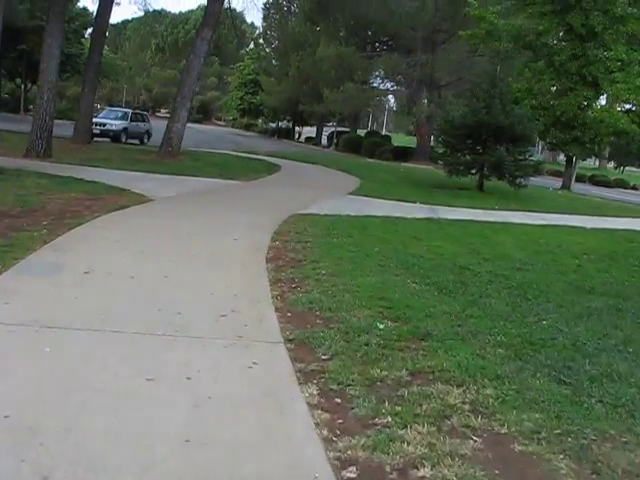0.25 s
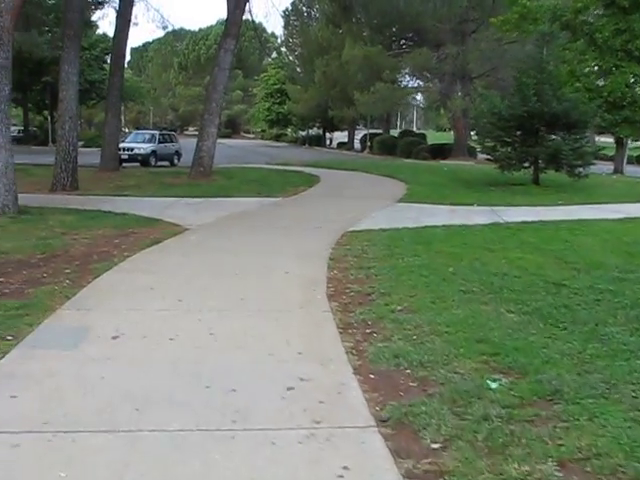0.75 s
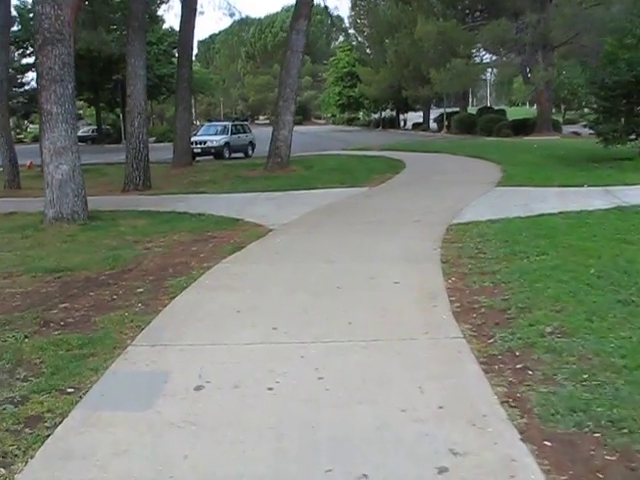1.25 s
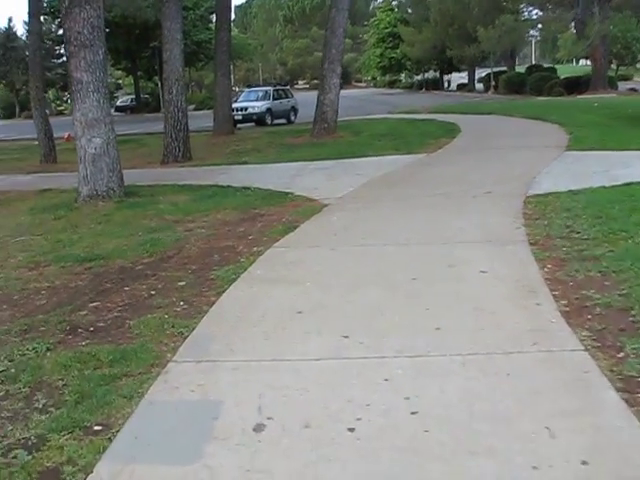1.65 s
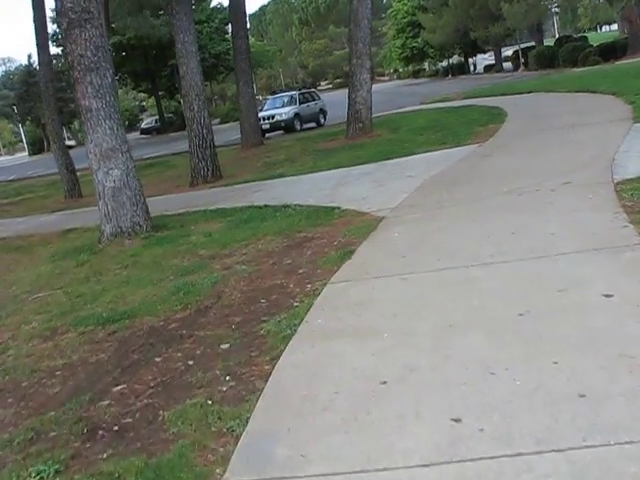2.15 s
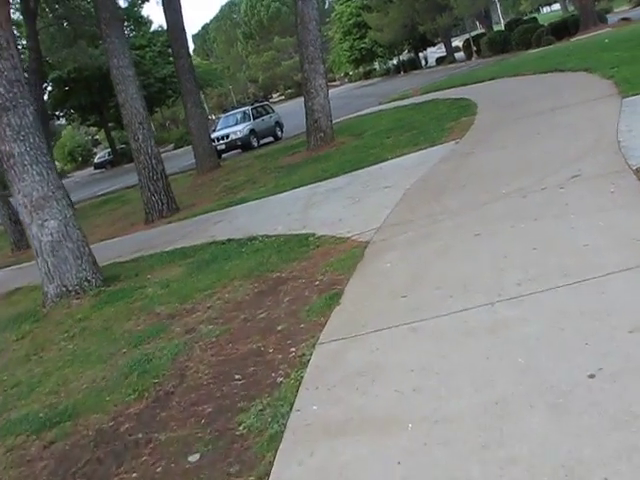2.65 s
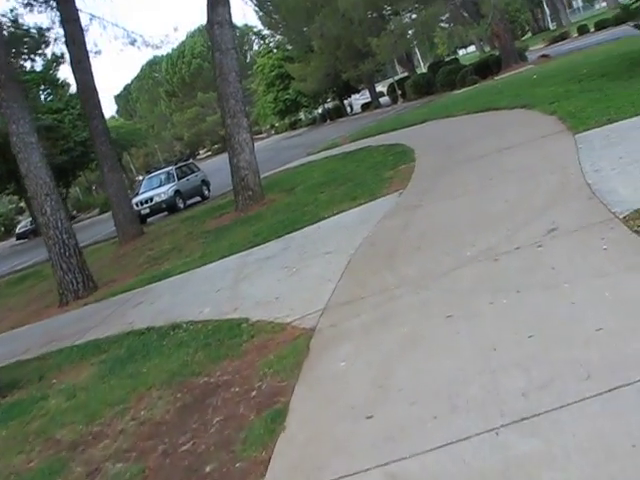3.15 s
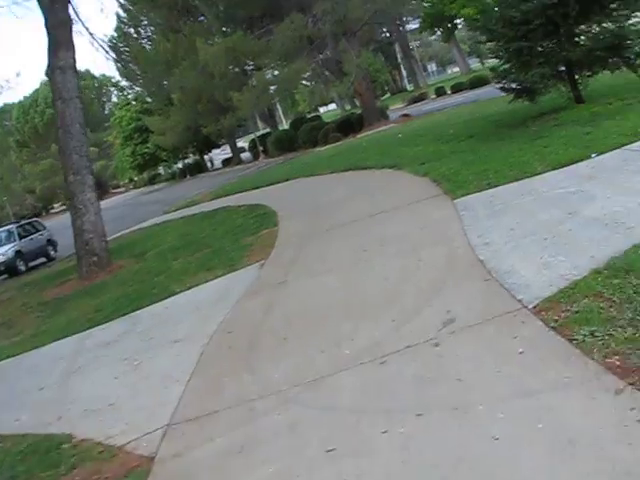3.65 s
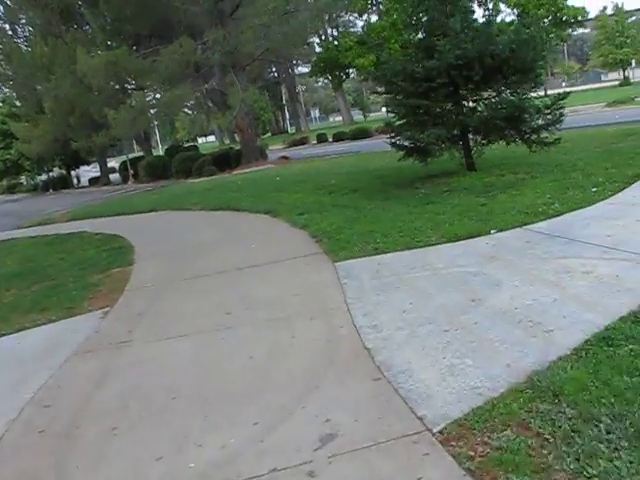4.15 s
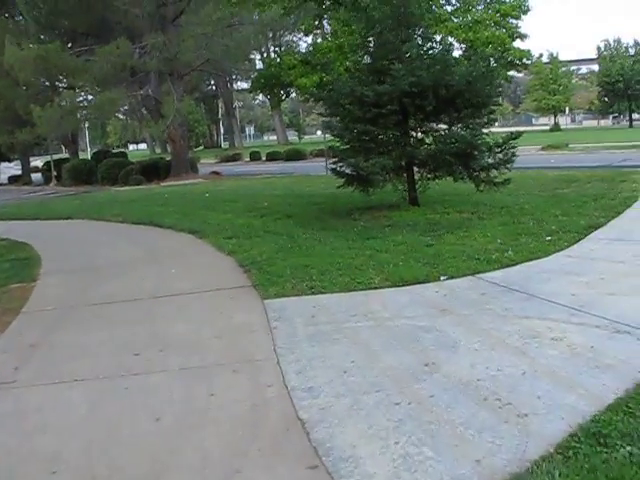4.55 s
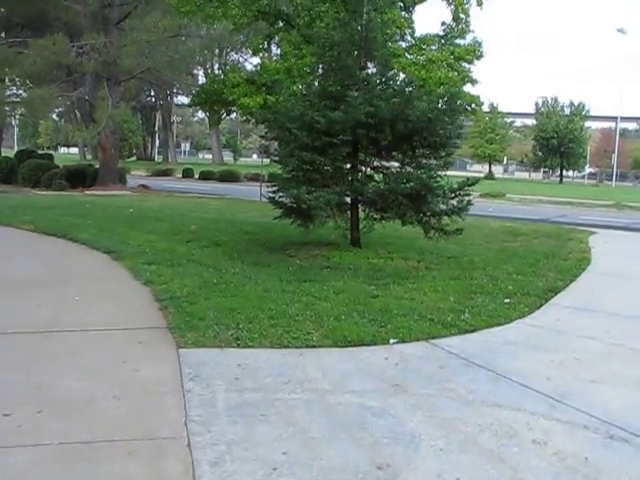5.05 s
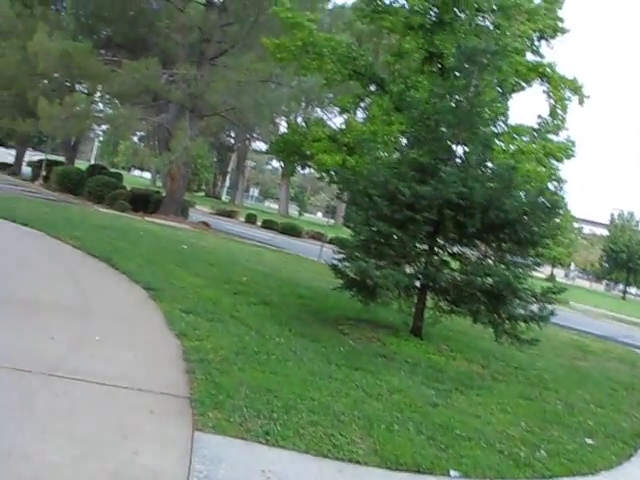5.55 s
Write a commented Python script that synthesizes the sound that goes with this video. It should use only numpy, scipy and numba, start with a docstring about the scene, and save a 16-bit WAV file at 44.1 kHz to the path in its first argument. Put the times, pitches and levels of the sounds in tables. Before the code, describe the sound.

A skateboard rolls on a concrete path in a leafy park, heard close from a stereo microphone above the board. Low, lumpy wind buffets the channels independently, far heavier on the right, with strong pops around 0.6-0.8, 2.1 and 3.1 seconds. A faint high bird repeats a falling note five times between 0.35 and 0.95; other thin chirps follow, clearest near 2.3, 4.3 and 4.9. Front and rear wheels clack over joints at about 0.25 and 0.5, 1.2 and 1.45, 2.2 and 2.5, 3.2 and 3.5, 4.4 and 4.7, then front wheels alone at 5.65. Each gives clustered hollow deck knocks, a short metallic rattle and a dull weight thud. Between them, grainy rolling, deck hum, hiss and bearing chatter continue, with tiny squeaks and grit ticks. After 3.5 the right wind mostly weakens; from 4.2 the wheel roar swells to the end while its ringing tone slides lower.

```python
"""Skateboard on a concrete path, heard at a two-port microphone above it; 5.8 s.
From the start, wind eddies and pops hit the ports, the right one more; a bird repeats a falling note.
At each slab joint front, then rear wheels drop, ringing the deck modes; trucks crack, the rider's weight thuds.
Concrete grain keeps deck and wheels humming; bearings chatter and squeak; other birds call throughout.
After about 3.5 s the right-port wind is mostly weaker; the wheel roar swells to the end as its ring falls."""
import sys
import numpy as np
from scipy import signal
from scipy.io import wavfile
from scipy.ndimage import uniform_filter1d
from numba import njit

SR = 44100
rng = np.random.default_rng(int(sys.argv[2]) if len(sys.argv) > 2 else 0)


def log_audio(samples):
    """Write samples as a 16-bit WAV file to the path given in sys.argv[1]."""
    # one column per channel
    frames = np.atleast_2d(samples).T
    # limit to full scale, then quantise
    limited = np.clip(frames, -1, 1)
    pcm = np.round(limited * 32767).astype(np.int16)
    wavfile.write(sys.argv[1], SR, pcm)


N = 254898

# one bird's repeated falling note: start_s, length_s, start_hz, level_db
SONG_NOTES = [(0.347, 0.054, 6560, -69), (.475, 0.071, 6660, -67), (.615, 0.084, 6600, -65),
              (.745, .062, 6770, -65), (.885, 0.07, 6270, -65)]
SONG_FALL_S, SONG_FALL_HZ = .066, 760   # a note this long falls this far; the fall grows as length squared
# other birds: start_s, length_s, start_hz, target_hz, level_db, left_minus_right_db
BIRD_CALLS = [(0.788, 0.058, 3740, 3640, -71, 0), (.985, .04, 3480, 3400, -70, 0),
              (1.085, .07, 3420, 3300, -72, 0), (1.985, 0.032, 3800, 3850, -64, -4),
              (2.264, 0.026, 4660, 4370, -59, -4), (2.602, .04, 3900, 3850, -67, -9),
              (3.8, .016, 3350, 3600, -61, 0), (3.818, 0.015, 3900, 3980, -61.5, 2),
              (4.006, 0.13, 4550, 4280, -73, 24), (4.26, 0.05, 3600, 3580, -60, -4),
              (4.88, .034, 3600, 4000, -62, 4), (4.944, .062, 3300, 3640, -57, 0)]
# wind on the ports: time_s, left_db, right_db, right_centre_hz
PORT_WIND = [(0, -30, -13, 148), (.35, -32, -22, 79), (.6, -28, -16, 142), (.8, -29.5, -16.5, 145),
             (.97, -27, -19, 86), (1.5, -29.5, -14.5, 78.3), (2, -32.5, -18.5, 77),
             (2.45, -25, -15.5, 87.4), (2.75, -23, -16, 95), (2.9, -18, -12.5, 108),
             (3.05, -26.5, -15.5, 94), (3.2, -22.5, -14.5, 91), (3.55, -30.5, -27, 87),
             (4.1, -28.5, -22, 83.5), (4.5, -30, -21.5, 85), (5.2, -31.5, -27, 86), (5.62, -27, -18.5, 78),
             (5.78, -21, -26, 77)]
# left port's wind centre, rising over the first second, then falling to the end: time_s, centre_hz
LEFT_WIND_CENTRE = [(0, 157), (1, 203), (3.3, 150), (4.6, 95), (5.78, 85)]
# loudest gust pops on the right port: start_s, peak_db (before the last softening)
GUST_POPS = [(.009, -6), (0.083, -12), (0.542, -27), (.631, -4.5), (0.7, -19), (.741, -7), (0.785, -3.5),
             (0.887, -18), (0.99, -26), (1.366, -25), (1.534, -14), (1.718, -14), (2.111, -6.5),
             (2.612, -16), (2.917, -26.5), (3.093, -12), (3.12, -7.5)]
# rolling: time_s, roar_db, low_rattle_db, high_rattle_db
ROLLING = [(0, -54.5, -63.5, -69), (.24, -50, -67.5, -80), (.45, -50.5, -60.5, -81),
           (.66, -51.5, -62.5, -79), (.9, -57.5, -70.5, -90), (1.2, -52, -71.5, -77),
           (1.4, -51.5, -63, -71.5), (1.8, -54.5, -70.5, -74), (2.08, -53, -68.5, -76),
           (2.32, -51.5, -63.5, -72.5), (2.8, -51, -68, -73), (3.4, -50.5, -67, -79), (3.9, -51, -72, -78),
           (4.25, -48.5, -64.5, -72), (4.62, -46, -64, -74), (5.15, -43, -70, -75), (5.4, -41.5, -59, -70),
           (5.78, -38.5, -64, -75)]
# wheel roar spectrum: freq_hz, relative_db_per_hz
ROAR_SPECTRUM = [(350, -30), (600, -4), (796, -34), (933, 1), (1270, -8), (1610, -3), (1800, -5.5),
                 (2030, -18.5), (2600, -24.5), (3380, -54), (5720, -120)]
# treble hiss spectrum: freq_hz, relative_db_per_hz
HISS_SPECTRUM = [(1500, -20), (2000, -11.5), (2800, -8.5), (4000, -13.5), (5600, -18.5), (6500, -19),
                 (9000, -20), (11500, -24.5), (14000, -32.5), (16000, -27)]
# left-right likeness of roar and hiss: freq_hz, likeness
STEREO_LIKENESS = [(60, 0.13), (130, 0.1), (290, 0.23), (640, 0.17), (1410, 0.79), (3100, 0.062),
                   (8000, 0.16), (15000, 0.22)]
REF_ROAR_DB, REF_RATTLE_DB = -50, -68
HISS_DB, HISS_PER_ROAR, HISS_PER_RATTLE = -61, .25, .4   # at reference; dB per dB of each
HUM_DB, HUM_PER_ROAR = -34.5, 0.55   # at reference roar; dB per dB
# faint pair of whistles: freq_hz, level_db
WHINE_PAIR = [(7852, -86.5), (7882, -86)]
# lower bearing bands: freq_hz, level_db (at loudest rattle), t60_s (each of two resonators), growth_db_per_db
# level_db is added to the rattle level
LOW_BEARING_MODES = [(4550, 1, 0.0021, 1.24), (7980, -6.5, 0.0032, 1.8)]
# upper bearing bands: same columns
HIGH_BEARING_MODES = [(10350, 2.5, 0.0023, 2), (12900, -3, .0025, 2.5)]
# bearing squeaks: start_s, length_s, start_hz, target_hz, level_db
BEARING_SQUEAKS = [(1.5, .02, 10900, 11000, -70), (1.82, .02, 12100, 12200, -72),
                   (2.1, .025, 12000, 12100, -75), (5.228, .055, 12600, 13400, -72),
                   (5.41, .02, 11000, 11300, -69), (5.565, 0.051, 12500, 13000, -72)]
# wheel resonance, lower as the board slows: time_s, centre_hz
WHEEL_RING_PITCH = [(0, 1810), (3.3, 1700), (4.7, 1584), (5.78, 1530)]
WHEEL_RING_DB, WHEEL_RING_DAMPING = -9, 0.087   # re roar; width over centre
# grit flung by a wheel: start_s, relative_db, freq_hz
GRIT_TICKS = [(2.733, -34, 9700), (3.0, -46, 10000), (5.157, -36, 13300), (5.638, -25, 6150),
              (5.673, -29, 5470)]
# the rider's weight lands: start_s, push_db
WEIGHT_THUDS = [(0.2585, -27), (.504, -11), (1.1792, -28), (1.4444, -17), (2.229, -13), (2.5022, -4),
                (3.233, -22), (3.514, -17.5), (4.401, -12), (4.4238, -7), (4.705, -21), (5.635, -11),
                (5.674, -4.5)]
# a wheel drops over a joint: start_s, axle, knock_db, crack_db, hardness_db_per_octave
JOINT_DROPS = [(0.2469, "front", -8.5, -18, 1.5), (0.2514, "front", -5, -27, 3),
               (0.2579, "front", -3.5, -32, 9), (.501, "rear", -12, -28, -0.5),
               (0.5074, "rear", -8.5, -27, -1), (1.1788, "front", -12.5, -26, 4.5),
               (1.194, "front", -7, -22, 3), (1.206, "front", -13, -32, 4),
               (1.4468, "rear", -19.5, -42, -7.5), (1.465, "rear", -15.5, -27, 1.5),
               (2.2206, "front", -13, -30.5, -5), (2.2366, "front", -8, -20.5, -1.5),
               (2.486, "rear", -17, -33, 0.5), (2.503, "rear", -8.5, -26, 1.5),
               (3.2321, "front", -5, -26.5, -6), (3.2385, "front", -5, -28.5, 5),
               (3.5095, "rear", -15, -35, 6), (3.5155, "rear", -9, -25, 4.5), (4.4, "front", -18, -24, 5.5),
               (4.422, "front", -13, -29, 7.5), (4.431, "front", -16, -36, 4),
               (4.708, "rear", -16, -35, -2.5), (4.732, "rear", -10.5, -34, 0.5),
               (4.739, "rear", -12.5, -40, 0), (5.633, "front", -22, -29, 9),
               (5.668, "front", -16, -33, 7.5), (5.678, "front", -19.5, -35, 8.5)]
# likeness of a blow to the rear of the deck: axle -> share (0-1)
AXLE_REAR_SHARE = {"front": 0.32, "rear": 0.86}
# deck and trucks: freq_hz, front_db, rear_db, rolling_db (all relative), t60_s (for knocks)
DECK_MODES = [(226.5, -22, 5, -15.5, 0.049), (306, -20.5, -18, -34.5, 0.083), (384.3, 6, -7.5, 8.5, 0.057),
              (455, -29.5, -21.5, -5, 0.12), (544.7, -18.5, -13, -5.5, 0.074), (669, -7.5, -9, -9.5, 0.024),
              (772, -15, -17, -21, 0.042), (937, -19.5, -19, -38.5, 0.034),
              (1130, -36.5, -22, -25.5, 0.034), (1370, -44, -56, -21, 0.043), (1673, -28.5, -28, -32, 0.05),
              (1780, -23.5, -33, -39.5, 0.04)]
CUTOFF_HZ = 15750


def amp(db):
    """dB to gain."""
    return 10 ** (np.asarray(db) / 20)


def rms_one(x):
    """Scale to rms 1."""
    return x / np.sqrt(np.mean(x ** 2) + 1e-20)


def in_time(rows):
    """Interpolate each column over all samples."""
    s, *columns = np.transpose(rows)
    return [np.interp(np.arange(N) / SR, s, c) for c in columns]


def at_hz(points, hz):
    """Read a table on a log-frequency axis."""
    table = np.array(points)
    return np.interp(np.log(hz), np.log(table[:, 0]), table[:, 1])


def drift(rate_hz):
    """Slow random curve, spread 1: two-pole low-passed noise."""
    step = 40   # samples per slow sample
    r = np.exp(-2 * np.pi * rate_hz * step / SR)
    white = rng.standard_normal(N // step + 2002)
    slow = signal.lfilter([1], [1, -2 * r, r * r], white)[2000:]   # drop the settling
    return np.interp(np.arange(N) / step, np.arange(len(slow)), rms_one(slow - slow.mean()))


def band_filter(x, order, low_hz, high_hz):
    """Butterworth band-pass."""
    return signal.sosfilt(signal.butter(order, [low_hz, high_hz], "band", fs=SR, output="sos"), x)


def ring(push, hz, t60_s):
    """Resonator: a unit click sets a decaying sine of height 1 ringing."""
    r, w = amp(-60 / (t60_s * SR)), 2 * np.pi * hz / SR
    return signal.lfilter([0, np.sin(w)], [1, -2 * r * np.cos(w), r * r], push + 1e-18)


def clicks(times_s, sizes):
    """Click train."""
    out = np.zeros(N)
    np.add.at(out, (np.asarray(times_s) * SR).astype(int), sizes)
    return out


def fade(x, t60_s):
    """Each click becomes an exponential decay."""
    return signal.lfilter([1], [1, -amp(-60 / (t60_s * SR))], x + 1e-18)


def soften(x, hz):
    """Two one-pole low-passes: a yielding contact spreads a click in time."""
    r = np.exp(-2 * np.pi * hz / SR)
    return signal.lfilter([(1 - r) ** 2], [1, -2 * r, r * r], x + 1e-18)


@njit
def sweep(x, hz, damping):
    """Band-pass with a moving centre; power of white noise kept even."""
    out, low, band = np.zeros(len(x)), 0., 0.
    for i in range(len(x)):
        f = 2 * np.pi * hz[i] / SR
        band += f * (x[i] - low - damping * band)
        low += f * band
        out[i] = band / np.sqrt(f)
    return out


def whistles(notes, waver_share, flicker_db):
    """Thin rough sines: a falling note bends late, a rising one arches over."""
    out, waver = np.zeros((2, N)), drift(90)
    for s, length_s, start_hz, target_hz, db, pan_db in notes:
        u = np.linspace(0, 1, int(length_s * SR))
        first = int(s * SR)
        span = slice(first, first + len(u))
        bend = u ** 3.8 if target_hz < start_hz else np.sin(2.5 * u)
        hz = (start_hz + (target_hz - start_hz) * bend) * (1 + waver_share * waver[span])
        envelope = np.sqrt(2) * amp(db) * np.sin(np.pi * u) ** .5
        note = envelope * np.sin(2 * np.pi * np.cumsum(hz) / SR)
        out[:, span] += note * amp([[pan_db / 2], [-pan_db / 2]])
    return out * amp(flicker_db * drift(60))


def birds():
    """Wavering sines: the repeated falling note and the scattered calls."""
    song = []
    for s, length_s, hz, db in SONG_NOTES:
        fall_hz = SONG_FALL_HZ * (length_s / SONG_FALL_S) ** 2
        song.append((s, length_s, hz, hz - fall_hz, db, 0))
    return whistles(song + BIRD_CALLS, waver_share=.005, flicker_db=3.0)


def port_wind(level_db, centre_hz, damping, lumpy_db, skirt, buffet_db, roof_hz):
    """Eddies tumble past one port: lumpy noise about a moving centre, slow buffeting below."""
    white = rng.standard_normal((2, N)) * amp(lumpy_db * drift(18.0))
    eddies = sweep(sweep(white[0], centre_hz, damping), centre_hz, skirt)
    eddies = soften(eddies, roof_hz)
    eddies = eddies / np.sqrt(uniform_filter1d(eddies ** 2, SR // 2))   # level evened over 0.5 s
    buffet = band_filter(white[1], 2, 22, 70)
    return amp(level_db) * (eddies + amp(buffet_db) * rms_one(buffet))


def gust_pops(level_db, centre_hz):
    """Gusts pop on the right port: sparse dull ticks, louder as the wind brightens, plus listed deep pops."""
    ticks = rng.random(N) < 260 / SR   # mean 260 per second
    sizes = amp(4.9 * np.minimum(rng.exponential(1, N), 4))
    ticks = ticks * sizes * rng.choice([-1, 1], N)
    tick_db = level_db - 37.5 + 37.0 * np.log2(centre_hz / 110)
    small = amp(tick_db) * rms_one(band_filter(ticks, 3, 220, 1450))

    s, peak_db = np.transpose(GUST_POPS)
    unit_peak = band_filter(clicks([0], 1)[:SR // 10], 2, 110, 650).max()
    deep = band_filter(clicks(s, amp(peak_db)) + 1e-18, 2, 110, 650)
    return small + soften(deep, 650) / unit_peak


def wind():
    """Independent turbulence at each port; pops on the right."""
    left_db, right_db, right_hz = in_time(PORT_WIND)
    left_hz, = in_time(LEFT_WIND_CENTRE)
    left = port_wind(left_db, left_hz, damping=0.43, lumpy_db=0.5, skirt=1.27, buffet_db=-8, roof_hz=700)
    right = port_wind(right_db, right_hz, damping=1.32, lumpy_db=2.5, skirt=1.62, buffet_db=-8, roof_hz=844)
    return np.array([left, right + gust_pops(right_db, right_hz)])


def whine():
    """Noise through two narrow resonators: a faint pair of whistles."""
    return sum(amp(db) * rms_one(ring(rng.standard_normal(N), hz, 0.35)) for hz, db in WHINE_PAIR)


def noise_bands(spectrum, low_hz, high_hz, patchy_db, count):
    """Stereo noise in count - 1 bands, each with its own level, flicker and likeness; rms 1."""
    out, edges = 0, np.geomspace(low_hz, high_hz, count)
    white, together = rng.standard_normal((2, 2, N)), drift(2.7)
    for k, (low, high) in enumerate(zip(edges, edges[1:])):
        mid, side = band_filter(white[k % 2], 2, low, high)
        hz = np.sqrt(low * high)
        alike = np.clip(at_hz(STEREO_LIKENESS, hz), -1, 1)
        gain = amp(at_hz(spectrum, hz) + patchy_db * (.6 * together + drift(5)))
        out = out + gain * (np.sqrt(1 + alike) * mid + np.sqrt(1 - alike) * side * [[1], [-1]])
    return rms_one(out)


def wheel_noise(roar_db, low_rattle_db):
    """Rough rolling contact: band noise for roar, and hiss that follows roar and rattle."""
    hiss_db = HISS_DB + HISS_PER_ROAR * (roar_db - REF_ROAR_DB)
    hiss_db = hiss_db + HISS_PER_RATTLE * (low_rattle_db - REF_RATTLE_DB)
    roar = amp(roar_db) * noise_bands(ROAR_SPECTRUM, 574, 2560, patchy_db=1.64, count=12)
    hiss = amp(hiss_db) * noise_bands(HISS_SPECTRUM, 2000, 16500, patchy_db=1.15, count=13)
    return roar + hiss


def wheel_ring(roar_db):
    """Concrete grain keeps one wheel resonance sounding, partly unlike in the two ports."""
    hz, = in_time(WHEEL_RING_PITCH)
    mid, side = (rms_one(soften(sweep(grain, hz, WHEEL_RING_DAMPING), 2400))
                 for grain in rng.standard_normal((2, N)))
    return amp(roar_db + WHEEL_RING_DB + 2.0 * drift(6.3)) * (mid + .45 * side * [[1], [-1]])


def bearings(level_db, modes):
    """Loose balls chatter: flickering noise rings each mode; growth sets how fast it rises with rattle."""
    out, loudest_db = 0, level_db.max()
    for hz, db, t60_s, growth in modes:
        mid, side = rng.standard_normal((2, N)) * amp(1.5 * drift(30))
        chatter = mid + 0.84 * side * [[1], [-1]]
        gain = amp(db + loudest_db + growth * (level_db - loudest_db) + 1.2 * drift(1.2))
        out = out + gain * rms_one(ring(ring(chatter, hz, t60_s), hz, t60_s))
    return out


def squeaks():
    """A bearing squeaks: short rough rising whistles, centred."""
    return whistles([row + (0,) for row in BEARING_SQUEAKS], waver_share=.006, flicker_db=6.0)


def grit():
    """Flung grit: each click rings two resonators in series, a tiny bright tick."""
    out = 0
    for s, db, hz in GRIT_TICKS:
        tick = clicks([s], amp(db - 27.5))
        out = out + ring(ring(tick, hz, 0.0018), hz, 0.0065)
    return out


def thuds():
    """The rider's weight lands: a low, slow push rings at 73.9 Hz."""
    s, push_db = np.transpose(WEIGHT_THUDS)
    push = soften(clicks(s, amp(push_db)), 190)
    push_rate = np.diff(push, prepend=0) * SR / (2 * np.pi * 85)
    return ring(push_rate, 73.9, 0.15)


def wheel_drops():
    """Time, knock, crack, rear share and edge hardness of every drop."""
    s, axle, knock_db, crack_db, hardness_db = zip(*JOINT_DROPS)
    rear = np.clip([AXLE_REAR_SHARE[a] for a in axle], 0, 1)
    return np.array(s), np.array(knock_db), np.array(crack_db), rear, np.array(hardness_db)


def cracks():
    """Trucks slam at each joint: brief uneven clatter and a dying rattle; duller from the rear."""
    s, _, crack_db, rear, _ = wheel_drops()
    out = 0
    mid, side = rng.standard_normal((2, N))
    clatter = (mid + side * [[1], [-1]]) * amp(3.35 * drift(450) - 1.0)
    clatter = signal.sosfilt(signal.butter(2, 1500, "high", fs=SR, output="sos"), clatter)
    for share, roof_hz in ((1 - rear, 6500), (rear, 3000)):
        blows = soften(clicks(s + 0.001, share * amp(crack_db)), 170)
        slam = fade(blows, 0.017) + amp(-17.5) * fade(blows, 0.18)
        out = out + slam * soften(soften(clatter, roof_hz), 8900)
    return out


def deck(hum_db):
    """Joints knock the deck modes; concrete grain keeps them humming."""
    s, knock_db, _, rear, hardness_db = wheel_drops()
    shape = (len(s), len(DECK_MODES))
    spread, late = rng.standard_normal(shape), rng.random(shape)
    grain = rng.standard_normal(N) * amp(2.3 * drift(10.5))
    knocks, hum = 0, 0
    for k, (hz, front_db, rear_db, roll_db, t60_s) in enumerate(DECK_MODES):
        blows = amp(knock_db + front_db + rear * (rear_db - front_db) + 0.5 * spread[:, k])
        blows *= amp(hardness_db * np.log2(hz / 400))   # a harder edge wakes the upper modes
        arrive_s = s + 0.001313 * late[:, k] * (hz > 600)   # uneven paths to the small parts
        drop = clicks(arrive_s, 0.6 * blows * (hz < 600))   # felt by the low modes only
        far_edge = clicks(arrive_s + 0.001158, 0.9 * blows)
        force = soften(far_edge - drop, 1900)   # urethane yields
        knocks = knocks + ring(force, hz, t60_s)
        hum = hum + amp(roll_db) * rms_one(ring(grain, hz, 0.33 * t60_s)) * (-1) ** k
    return knocks + amp(hum_db) * rms_one(hum)


def scene():
    """Board near the middle, thuds 3 dB stronger at left, wind separate in each port."""
    roar_db, low_db, high_db = in_time(ROLLING)
    hum_db = HUM_DB + HUM_PER_ROAR * (roar_db - REF_ROAR_DB)
    background = birds() + wind()
    rolling = whine() + wheel_noise(roar_db, low_db) + wheel_ring(roar_db)
    rattle = bearings(low_db, LOW_BEARING_MODES) + bearings(high_db, HIGH_BEARING_MODES) + squeaks()
    impacts = grit() + thuds() * amp([[1.5], [-1.5]]) + cracks()
    return background + rolling + rattle + impacts + deck(hum_db)


def record(dry):
    """Round the peaks, then cut the top with a steep low-pass."""
    rounded = 1.1 * np.tanh(dry / 1.1)
    return signal.sosfilt(signal.ellip(12, .5, 70, CUTOFF_HZ, fs=SR, output="sos"), rounded)


dry = scene()
out = record(dry)
log_audio(out)
```